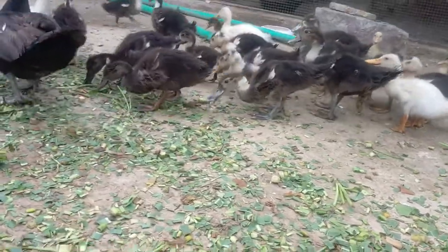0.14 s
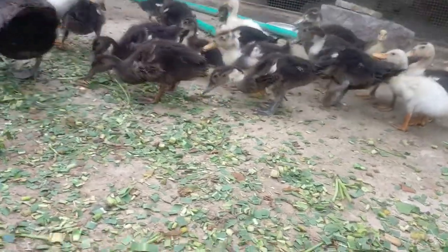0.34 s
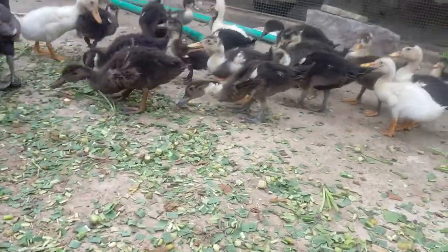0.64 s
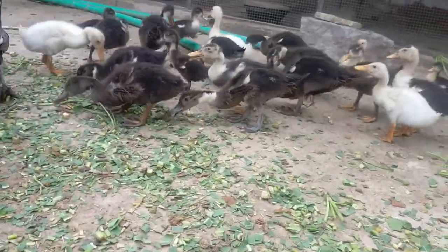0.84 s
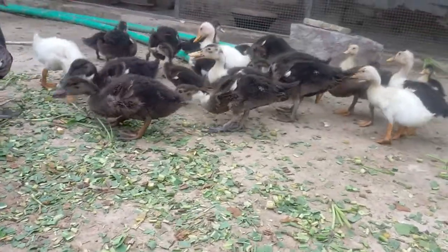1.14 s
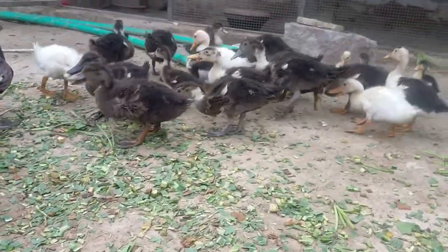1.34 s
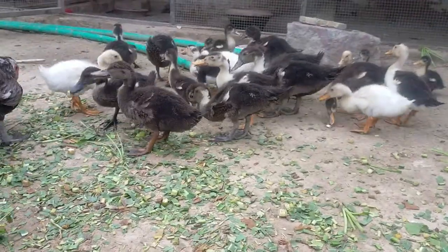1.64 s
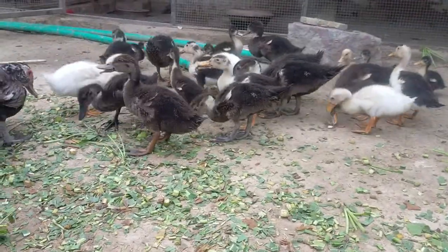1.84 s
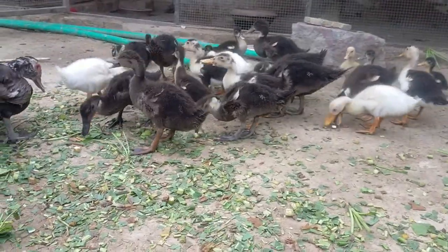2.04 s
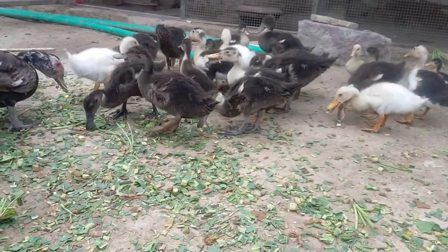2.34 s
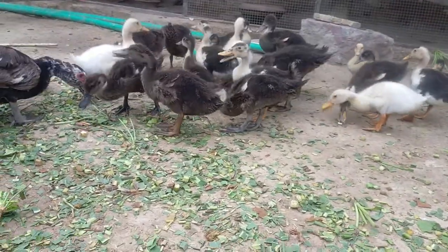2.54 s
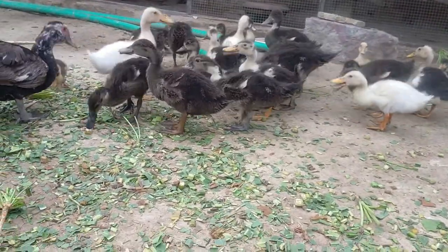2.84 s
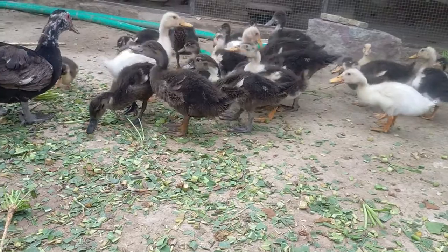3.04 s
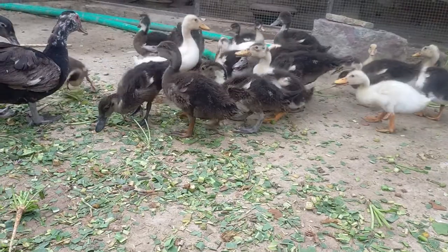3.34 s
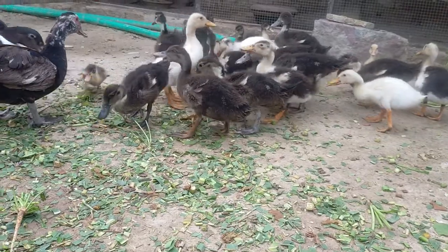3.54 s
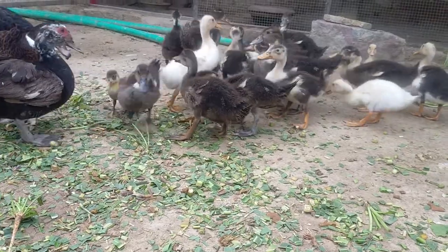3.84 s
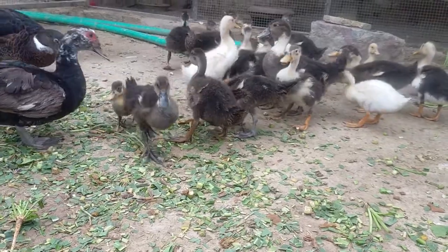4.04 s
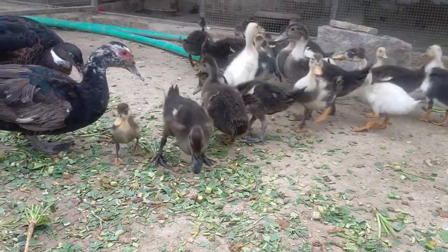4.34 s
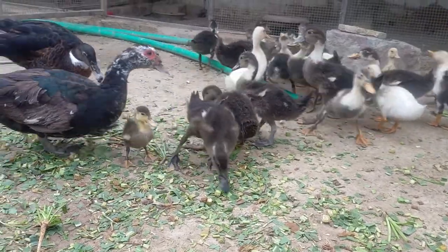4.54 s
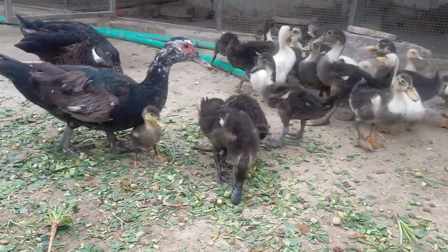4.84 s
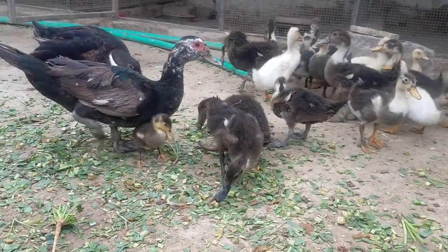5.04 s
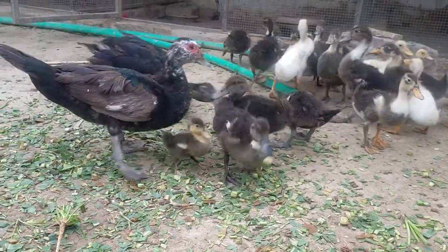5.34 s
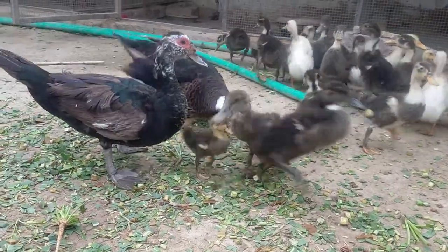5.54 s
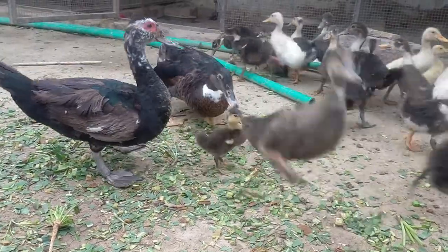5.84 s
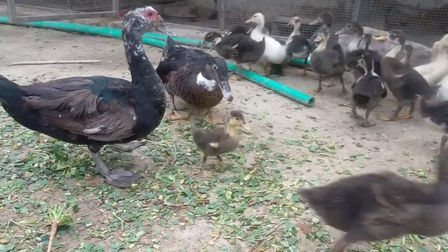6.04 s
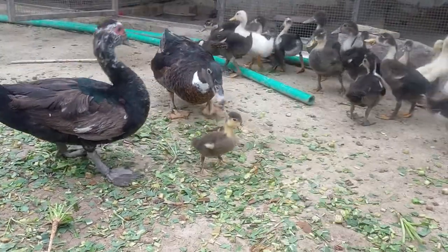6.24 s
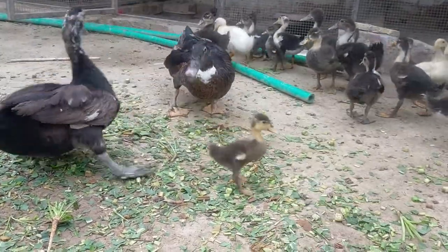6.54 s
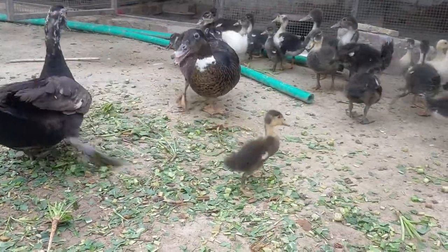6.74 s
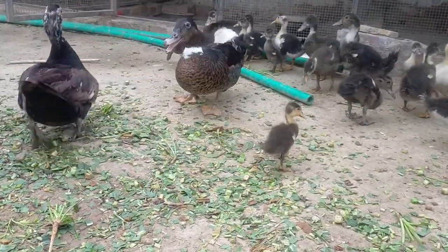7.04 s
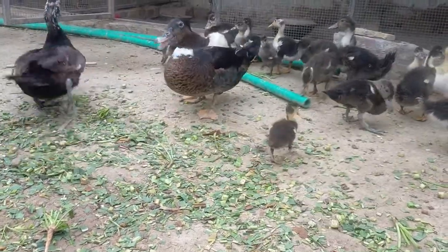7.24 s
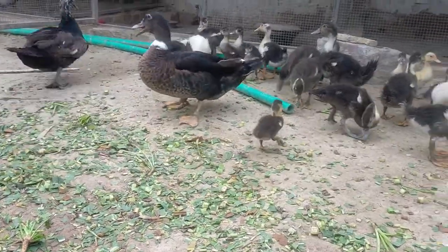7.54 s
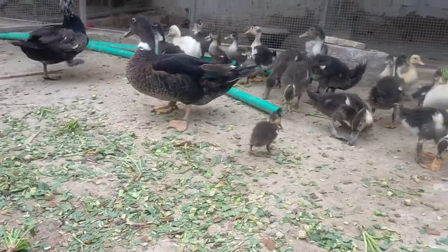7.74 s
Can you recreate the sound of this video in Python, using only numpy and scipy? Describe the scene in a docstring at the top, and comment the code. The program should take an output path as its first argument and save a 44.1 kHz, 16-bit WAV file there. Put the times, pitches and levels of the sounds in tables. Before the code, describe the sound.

A flock of ducklings twitters and peeps over rustling leaves, a duck quacks early, and a rooster crows hoarsely close by near the end.

```python
"""Ducklings and a rooster in a walled yard

A flock of ducklings feeds around the microphone: twitter from many small arched whistles, fluttered trills,
thin rasps of filtered air, gliding peeps and one shrill squeal; leaves rustle, a few dull knocks are heard.
A grown duck quacks in the first three seconds, pulses ringing its throat; a hen murmurs far off later on.
Near the end a rooster crows close by: hoarse and rasping, a crack, then a clean harmonic note that sinks.
One microphone in the open air, the same in both ears."""
import sys
import numpy as np
from scipy import signal
from scipy.fft import rfft, irfft
from scipy.io import wavfile
from scipy.ndimage import uniform_filter1d, map_coordinates

SR = 44100
rng = np.random.default_rng(int(sys.argv[2]) if len(sys.argv) > 2 else 0)


def store_wav(level_fs):
    """Save 16-bit WAV to argv[1]."""
    pcm = np.round(np.clip(np.atleast_2d(level_fs), -1, 1) * 32767)
    wavfile.write(sys.argv[1], SR, pcm.T.astype(np.int16))


N = 347949

# how busy the flock is: (time [s], level [dB] before the twitter's own trim)
FLOCK_ACTIVITY = [(0.0, -41.5), (0.15, -52), (0.96, -49.5), (1.09, -38), (1.35, -51.5), (1.89, -46),
                  (2.04, -42.5), (2.7, -53.5), (3.15, -42.5), (3.27, -50), (5.71, -49.5), (6.05, -56)]
# spectrum of the rooster's rasp and breath: (frequency [Hz], relative level [dB])
ROOSTER_RASP = [(260, -51.5), (450, -35.5), (759, -19), (921, -4.5), (1170, -13.5), (1340, 5.5), (1570, -9),
                (2320, -6), (2520, -20), (3180, -25.5), (3460, -42), (4580, -24.5), (6830, -34),
                (7620, -28), (8200, -70), (10700, -64), (18000, -120)]
CRACK_START_S, CRACK_LENGTH_S = 6.73, 0.13


def from_db(db):
    """Decibels to gain."""
    return 10 ** (np.asarray(db) / 20)


def rms_one(x):
    """Scale to rms 1."""
    return x / np.sqrt(np.mean(x ** 2) + 1e-20)


def since(start):
    """Seconds since a moment, at every sample."""
    return np.arange(N) / SR - start


def in_time(rows):
    """Each column of a curve at every sample."""
    s, *columns = np.transpose(rows)
    return [np.interp(since(0), s, column) for column in columns]


def at_hz(points, hz):
    """Read a spectrum in dB, along a logarithmic frequency axis."""
    table_hz, table_db = np.transpose(points)
    return np.interp(np.log(hz), np.log(table_hz), table_db)


def wander(rate, size):
    """Smooth random curve, spread about 1, through so many random knots a second."""
    knots = rng.standard_normal(int(size * rate / SR) + 4)
    steps = np.arange(0, len(knots), 1 / 8)
    curve = map_coordinates(knots, [steps], order=2, mode="nearest")
    return np.interp(np.arange(size) * (rate / SR) + 1, steps, curve)


def phase_of(hz):
    """Running phase of a gliding tone."""
    return 2 * np.pi * np.cumsum(hz) / SR


def lowpass(x, order, hz):
    """Butterworth low-pass."""
    return signal.sosfilt(signal.butter(order, hz, fs=SR, output="sos"), x)


def coloured(x, spectrum):
    """Give a sound a spectrum; rms 1."""
    hz = np.fft.rfftfreq(N, 1 / SR) + 1e-3
    gain = from_db(at_hz(spectrum, hz))
    return rms_one(irfft(rfft(x) * gain, N))


def resonate(x, modes):
    """Parallel two-pole resonances with alternating signs."""
    out = 0
    for k, (hz, width, db) in enumerate(modes):
        r = np.exp(-np.pi * width / SR)   # pole radius: the narrower, the longer it rings
        poles = [1, -2 * r * np.cos(2 * np.pi * hz / SR), r * r]
        ringing = signal.lfilter([1, 0, -1], poles, x + 1e-18)
        out = out + (-1) ** k * from_db(db) * (1 - r * r) / 2 * ringing
    return out


def swell(size, edges):
    """A call opens and closes smoothly; edges is the share of it spent doing so."""
    return signal.windows.tukey(size, float(np.clip(edges, 0, 1)))


def envelope(age, length, attack, release):
    """Attack, hold and release, from 0 to 1; all times in seconds."""
    return np.clip(age / attack, 0, 1) * np.clip((length - age) / release, 0, 1)


def add(out, start, sound):
    """Mix a sound in at a time, cutting what lies outside the scene."""
    at = int(start * SR)
    sound = sound[max(-at, 0):max(N - at, 0)]
    out[max(at, 0):max(at, 0) + len(sound)] += sound


def peep(length, first_hz, middle_hz, last_hz, overtone_db, waver=0.0012):
    """A whistle with two overtones, arching through three pitches; waver is a share of pitch."""
    size = int(length * SR)
    parabola = np.polyfit([0, .5, 1], [first_hz, middle_hz, last_hz], 2)
    hz = np.polyval(parabola, np.linspace(0, 1, size))
    phase = phase_of(hz * (1 + waver * wander(400, size)))
    tone = sum(from_db(k * overtone_db) * np.sin((k + 1) * phase) for k in range(3))
    return rms_one(tone) * swell(size, 0.59)


def open_air(level_db=-51.5):
    """Rumble and hiss of the open air: steady noise given a spectrum."""
    # (frequency [Hz], relative level [dB])
    air_spectrum = [(12, -31.5), (20, 4.5), (108, 4.5), (230, -9), (569, -12.5), (696, -9.5), (809, -14.5),
                    (1270, -4.5), (1440, -3.5), (1950, -8.5), (3480, -33.5), (5080, -16.5), (5760, -27.5),
                    (7050, -8), (8200, -39), (10700, -65.5), (18000, -120)]
    return from_db(level_db) * coloured(rng.standard_normal(N), air_spectrum)


def twitter(count, pitch_hz, spread, overtone_db, uneven_db, waver):
    """Many small arched peeps from all over the flock, some nearer and some farther by level; rms 1."""
    out = np.zeros(N)
    for k, (when, span, rise, fall, nearness, voice) in enumerate(rng.random((count, 6))):
        top_hz = pitch_hz * np.exp(spread * (2 * voice - 1))
        first_hz, last_hz = top_hz * (1 - 0.2597 * rise), top_hz * (1 - .36 * fall)
        call = peep(.02 + .036 * span, first_hz, top_hz, last_hz, overtone_db, waver)
        start = (k + 2 * when - 1) / count * N / SR   # evenly spread, each shifted by chance
        add(out, start, from_db(2 * uneven_db * nearness ** 2) * call)
    return rms_one(out)


def chatter(twitter_db=-2, thin_db=-59.5, murmur_db=-69, top_hz=6500):
    """The flock's twitter follows how busy it is; thin high peeps and low murmurs go on throughout."""
    middle = twitter(count=720, pitch_hz=1993, spread=.27, overtone_db=-16, uneven_db=8.0, waver=0.025)
    thin = twitter(count=200, pitch_hz=3714, spread=.45, overtone_db=-19, uneven_db=3.5, waver=.04)
    low = twitter(count=150, pitch_hz=483, spread=0.49, overtone_db=-9.5, uneven_db=7, waver=0.021)
    busy_db = in_time(FLOCK_ACTIVITY)[0]
    voices = from_db(busy_db + twitter_db) * middle
    voices += from_db(thin_db) * thin + from_db(murmur_db) * low
    return lowpass(voices, 6, top_hz)


def trills(beat_hz=80, sweep=0.125, jitter=0.0862, throb=0.51, second_db=-23, third_db=-21):
    """The nearer trills: a whistle chopped and swept by a fast, uneven flutter of the syrinx."""
    # (start [s], length [s], pitch [Hz], level [dB])
    trill_calls = [(-.02, 0.15, 2017, -35), (.453, 0.098, 2070, -39.5), (.56, 0.063, 1967, -37.5),
                   (.666, 0.053, 1930, -37), (.864, .15, 1885, -37), (1.091, 0.13, 1993, -44.5),
                   (1.246, 0.065, 2045, -36.5), (1.455, 0.17, 1838, -39), (1.806, 0.048, 2053, -38),
                   (1.896, 0.053, 1977, -34), (1.962, 0.072, 1780, -40), (2.028, 0.11, 2088, -37),
                   (2.161, .12, 1947, -36.5), (2.434, 0.087, 1828, -37), (2.49, 0.12, 1950, -35.5),
                   (2.793, .13, 1885, -38), (2.967, 0.13, 1857, -46.5), (3.227, 0.1, 1952, -42),
                   (3.51, .2, 1935, -43), (3.849, 0.041, 1885, -41.5), (3.925, 0.074, 1907, -45),
                   (4.168, 0.13, 1823, -46), (4.994, 0.051, 1945, -38.5), (6.321, 0.042, 1928, -34.5),
                   (7.228, 0.062, 1770, -36.5), (7.35, .051, 1820, -37)]
    out = np.zeros(N)
    for start, length, hz, db in trill_calls:
        size = int(length * SR)
        beat = phase_of(beat_hz * np.exp(0.38 * wander(130, size))) + rng.uniform(0, 2 * np.pi)
        arch = 1 + 0.1008 * (np.hanning(size) - .6)
        unsteady = 1 + sweep * np.sin(beat) + jitter * wander(1100, size)
        phase = phase_of(hz * arch * unsteady)
        tone = np.sin(phase) + from_db(second_db) * np.sin(2 * phase) + from_db(third_db) * np.sin(3 * phase)
        flutter = (1 + throb * np.cos(beat)) * from_db(1.8 * wander(712, size))
        add(out, start, from_db(db) * rms_one(tone * flutter) * swell(size, 0.27))
    return out


def rustle(level_db=-56, follows=0.2, shared_db=7, patchy_db=7.0, patch_hz=20, count=10):
    """Feet and bills in the chopped leaves: short scuffs, each in its own part of the spectrum."""
    # spectrum of the leaves: (frequency [Hz], relative level [dB])
    leaf_spectrum = [(1100, -7), (2000, -1.5), (2900, 18.5), (3700, -15), (5100, 14), (6000, 5.5),
                     (7000, -20), (7800, -20.5)]
    out = 0
    together = wander(patch_hz, N)
    edges = np.geomspace(1100, 8000, count + 1)
    for low, high in zip(edges, edges[1:]):
        bandpass = signal.butter(2, [low, high], "band", fs=SR, output="sos")
        band = signal.sosfilt(bandpass, rng.standard_normal(N))
        scuff_db = np.minimum(shared_db * together + patchy_db * wander(patch_hz, N), 6)
        out = out + band * from_db(at_hz(leaf_spectrum, np.sqrt(low * high)) + scuff_db)
    busy_db = in_time(FLOCK_ACTIVITY)[0]
    # follows: share of the flock's swing in level
    return from_db(level_db + follows * (busy_db - busy_db.mean())) * rms_one(out)


def quacks(jitter=.03, breath=0.071, uneven_db=2.0):
    """Uneven pulses and puffs of air ring the duck's throat and body; each quack swells and fades."""
    # (start [s], length [s], pitch [Hz], fall [share of pitch], level [dB], body against throat [dB])
    quack_calls = [(0.127, 0.056, 233.8, 0.12, -25.5, -18), (0.335, 0.074, 203.6, -0.22, -30, -19.5),
                   (0.508, 0.0885, 214.3, .08, -29, -15.5), (1.01, 0.099, 194.9, 0.29, -32.5, -11),
                   (1.089, 0.09, 209.3, 0.26, -31, -11.5), (1.524, 0.076, 290.2, 0.11, -39.5, -7.5),
                   (1.605, .064, 235, 0.1, -31, -18), (2.089, 0.061, 217.5, 0.12, -36.5, -18),
                   (2.337, 0.06, 250.2, 0.41, -31.5, -22), (3.015, 0.076, 216.6, .1, -40.5, -18)]
    # resonances of the throat, then of the body: (centre [Hz], width [Hz], relative level [dB])
    throat_modes = [(800, 107, -8), (1412, 132, 6.5), (1950, 510, -9), (2960, 350, -17.5),
                    (5300, 130, -22.5)]
    body_modes = [(202, 81, 4), (426, 125, 5), (785, 100, 2)]
    out = np.zeros(N)
    for start, length, hz, fall, db, body_db in quack_calls:
        size = int(length * SR)
        phase = phase_of(hz * (1 + fall * np.linspace(.5, -.5, size) + jitter * wander(208, size)))
        pulses = np.diff(phase // (2 * np.pi), prepend=0) * from_db(uneven_db * wander(212, size))
        puffs = breath * rng.standard_normal(size) * (1 + np.cos(phase)) / 2
        source = pulses + puffs
        call = resonate(source, throat_modes) + from_db(body_db) * resonate(source, body_modes)
        add(out, start, from_db(db) * rms_one(call) * np.hanning(size))
    return out


def rasps(flutter_db=2.5, flutter_hz=260, top_hz=7100, edges=0.48, arch=.07):
    """Fluttering air through one narrow, high resonance that rises and falls with each call."""
    # (start [s], length [s], centre [Hz], width [Hz], level [dB])
    rasp_calls = [(0.141, 0.026, 5330, 400, -46.5), (0.369, 0.034, 5330, 1990, -43.5),
                  (0.593, 0.092, 6140, 990, -37), (0.932, 0.064, 5100, 2040, -45),
                  (1.252, 0.052, 5750, 1500, -48), (1.522, .1, 5800, 1190, -49.5),
                  (1.69, 0.097, 6090, 1560, -40.5), (1.788, 0.2, 5160, 1300, -47.5),
                  (2.037, 0.082, 5370, 1100, -37), (2.054, .18, 5440, 620, -38),
                  (2.699, 0.057, 5320, 900, -40), (2.709, 0.2, 5560, 650, -36.5),
                  (3.622, .14, 3120, 700, -49.5), (3.624, 0.12, 5600, 1780, -47.5),
                  (3.706, 0.069, 6400, 1430, -37.5), (3.946, 0.044, 5540, 1290, -46.5),
                  (4.389, 0.078, 5700, 1300, -50), (4.631, 0.1, 5280, 1780, -40),
                  (5.707, 0.03, 5800, 2980, -38), (6.16, 0.036, 5250, 900, -44),
                  (6.33, 0.042, 5140, 1000, -39), (7.22, 0.056, 5260, 1000, -45.5),
                  (7.5, .14, 5100, 1100, -51.5), (7.851, 0.046, 5460, 2000, -44.5)]
    out = np.zeros(N)
    for start, length, hz, width, db in rasp_calls:
        size = int(length * SR)
        air = rng.standard_normal((2, size)) * from_db(flutter_db * wander(flutter_hz, size))
        slow = lowpass(air, 2, width / 2)
        phase = phase_of(hz * (1 + arch * (1 / 4 - np.linspace(-1, 1, size) ** 2)))
        # two slow noises on a cosine and a sine make a band of noise about the gliding centre
        band = slow[0] * np.cos(phase) + slow[1] * np.sin(phase)
        add(out, start, from_db(db) * rms_one(band) * swell(size, edges))
    return lowpass(out, 8, top_hz)


def peeps(end_drop=0.076, full_drop_hz=3040):
    """The nearer single peeps: each glides and arches, the lower ones more flatly."""
    # (start [s], length [s], pitch [Hz], rise [share of pitch], level [dB], step between overtones [dB])
    peep_calls = [(0.377, 0.012, 1590, .02, -38, 2), (.395, .08, 1555, 0, -44.5, -6),
                  (.454, 0.054, 3070, -0.33, -45, -28), (0.456, 0.052, 848, -0.09, -49.5, -8),
                  (1.521, 0.036, 920, -0.052, -40.5, -7), (1.599, 0.034, 933, .13, -41, -17),
                  (2.293, .064, 2860, -0.36, -50, -26), (2.359, 0.035, 928, -1, -41.5, -23),
                  (2.374, .049, 1470, -0.043, -42, -24), (2.639, 0.075, 2890, 0.18, -47.5, -30),
                  (3.005, 0.043, 884, -0.12, -46, -3), (3.182, 0.053, 3370, -.06, -54.5, -5),
                  (3.58, .07, 3580, -0.25, -53, -11), (3.663, .014, 1513, 0.059, -29.5, -6),
                  (3.685, 0.042, 1530, -0.026, -48, -17), (3.758, 0.03, 2440, 0.011, -46, 2),
                  (3.898, 0.049, 2320, -.18, -43, -9.5), (3.955, 0.059, 1350, .02, -35, -11.5),
                  (4.043, 0.06, 2305, -0.098, -54, -20), (4.081, 0.051, 1362, -.03, -39.5, -15),
                  (4.087, 0.038, 3410, -0.17, -46, -3), (4.272, 0.033, 4950, -0.19, -53, -20),
                  (4.299, 0.045, 2310, 0.12, -48, -8), (4.46, .027, 4350, -.14, -49, -25),
                  (4.494, 0.028, 1230, -0.13, -42, -6.5), (4.659, 0.11, 1157, -.015, -38, -28),
                  (4.672, 0.062, 1460, 0, -45.5, -16), (4.851, 0.035, 2230, -0.39, -45, -12),
                  (5.398, 0.046, 2120, -0.26, -45, -17), (5.414, 0.05, 3180, 0.2, -52.5, -3),
                  (5.863, 0.027, 1980, 0.2, -43, -27)]
    out = np.zeros(N)
    for start, length, hz, rise, db, overtone_db in peep_calls:
        ends = 1 - end_drop * min(hz / full_drop_hz, 1) ** 2   # both ends hang below the middle
        call = peep(length, hz * (ends - rise / 2), hz, hz * (ends + rise / 2), overtone_db)
        add(out, start, from_db(db) * call)
    return out


def knocks():
    """Soft, short, dull bumps, the last ones in a quickening run: an impulse rings two low resonances."""
    # (time [s], peak level [dB])
    knock_times = [(2.829, -32.5), (7.072, -22.5), (7.176, -30.5), (7.204, -39), (7.229, -40), (7.252, -38),
                   (7.273, -41), (7.291, -39)]
    # (centre [Hz], width [Hz], relative level [dB])
    knock_modes = [(338, 210, 16.5), (650, 340, 16.5)]
    out = np.zeros(N)
    bump = lowpass(resonate(signal.unit_impulse(2000), knock_modes), 2, 1000)
    for start, db in knock_times:
        add(out, start, from_db(db) * bump / np.abs(bump).max())
    return out


def far_hen(overtone_db=-2, bend=0.041):
    """Soft, low notes from across the yard, each starting a little high."""
    # (start [s], length [s], pitch [Hz], level [dB])
    hen_notes = [(4.373, 0.062, 367, -63), (5.254, 0.13, 356, -60), (5.492, 0.11, 354, -59),
                 (5.899, 0.14, 353, -60.5)]
    out = np.zeros(N)
    for start, length, hz, db in hen_notes:
        add(out, start, from_db(db) * peep(length, hz * (1 + bend), hz, hz, overtone_db))
    return out


def squeal(start_s=5.577, length_s=.172, level_db=-26, low_hz=3187, bend_hz=552,
           delay_s=0.018, push_s=0.13, attack_s=0.014, release_s=0.029, waver=.0023, collapse=0.059,
           sideband_db=-23, weak_db=-13, half_db=-14, held_half_db=-28):
    """A jostled duckling: at full effort a shrill tone and its octave; weak ends break into subharmonics."""
    age = since(start_s)
    effort = envelope(age - delay_s, push_s, attack_s, release_s)
    # the pitch dips to low_hz in the middle and is bend_hz higher at the ends
    hz = low_hz + bend_hz * np.clip(2 * age / length_s - 1, -1, 1) ** 2
    spent = (1 - effort) * (age > length_s / 2)   # the pitch turns ragged as the push ends
    phase = phase_of(hz * (1 + (waver + collapse * spent) * wander(590, N)))
    halves = sum(np.sin(k * phase / 2 + 0.67 * wander(300, N)) for k in (1, 3))
    quarters = sum(np.sin(k * phase / 4 + wander(400, N)) for k in (3, 5, 7))
    tone = from_db(weak_db * (1 - effort)) * (np.sin(phase) + from_db(sideband_db) * quarters)
    octave = effort ** 2 * np.sin(2 * phase)
    broken = (from_db(half_db) * (1 - effort) + from_db(held_half_db)) * halves
    loudness = np.sqrt(2) * from_db(level_db) * envelope(age, length_s, 0.0025, 0.045)
    return loudness * (tone + octave + broken)


def crack_strength(attack_s=0.0082, release_s=0.14):
    """The crack comes quickly and dies away; within 0-1."""
    return envelope(since(CRACK_START_S), CRACK_LENGTH_S, attack_s, release_s)


def crow_hoarse(sag=.03, jitter=.0035, drift=.004, shimmer_db=3.0, half_blur=0.12, catch_s=0.014,
                rasp_caught=0.026, surge_hz=4.35, surge_peak_s=6.635, surge_db=11,
                crack_hiss_db=7, fullness=0.65):
    """Strained syllables: each opens in rasp, may catch on a period-doubled tone, and sags at its end."""
    # the third syllable opens the last note: (start [s], length [s], attack [s], release [s],
    # rasp at first [share 0-1], time until the tone catches [s], pitch [Hz], level [dB],
    # half-pitch lines before their surges [dB], hiss before the crack's boost [dB])
    syllables = np.array([(6.088, 0.24, 0.042, .11, 0.9, .25, 897, -26.5, 10.5, -30),
                          (6.382, .595, 0.09, 0.044, 0.96, 0.0664, 874.4, -20, -8, -21.5),
                          (6.957, 0.13, 0.029, .11, 0.49, .14, 837, -21.5, -12, -25)])
    # (multiple of pitch [ratio], relative level [dB])
    hoarse_lines = [(0.5, -42), (1, 1), (1.5, -4.5), (2, 1.5), (2.5, -12.5), (3, -10.5), (3.5, -30.5),
                    (4, -23.5), (4.5, -24.5), (5, -17.5), (5.5, -26), (6, -36.5), (6.5, -37), (7, -39.5),
                    (7.5, -26.5), (8, -20.5), (8.5, -32), (9, -40.5)]
    # hiss of the strained voice: (frequency [Hz], relative level [dB])
    strain_spectrum = [(1500, -27.5), (3000, 6), (3500, -4), (4500, 7), (5300, -4.5), (6100, -9),
                       (6950, 8.5), (7500, -24.5), (8200, -18.5)]

    t = since(0)
    current = syllables[np.searchsorted(syllables[1:, 0], t)]   # the syllable in force at every sample
    start, length, attack, release, rasp, catches, pitch_hz, db, half_db, hiss_db = current.T
    age = t - start
    uncaught = (1 - np.tanh((age - catches) / catch_s)) / 2
    rasp_share = np.clip(rasp_caught + (rasp - rasp_caught) * uncaught, 0, 1)
    # the half-pitch lines come in surges
    half_db = half_db + surge_db * np.cos(2 * np.pi * surge_hz * since(surge_peak_s))

    hz = pitch_hz * (1 - sag * np.clip(age / length, 0, 1) ** 7 + drift * wander(35, N))
    phase = phase_of(hz * (1 + jitter * (1 + 7 * rasp_share) * wander(500, N)))
    tone = np.zeros(N)
    for multiple, line_db in hoarse_lines:
        half_steps = round(2 * multiple)
        halfway = half_steps % 2   # lines between the harmonics come and go, and are blurred
        blur = halfway * half_blur * wander(200, N) + rng.uniform(0, 2 * np.pi)
        gain = from_db(line_db + halfway * half_db + shimmer_db * wander(45, N))
        tone += gain * np.sin(half_steps / 2 * phase + blur)
    tone /= np.sqrt(uniform_filter1d(tone ** 2, size=1500))   # even loudness

    puffs = rng.standard_normal(N) * (1 + np.cos(phase / 2))   # one puff every second period
    hiss = from_db(hiss_db + crack_hiss_db * crack_strength()) * coloured(puffs, strain_spectrum)
    rasping = np.sqrt(rasp_share) * coloured(puffs, ROOSTER_RASP)
    voice = np.sqrt(1 - rasp_share) * tone + rasping + hiss
    loudness = from_db(db) * envelope(age, length, attack, release) ** fullness
    return uniform_filter1d(loudness, size=300) * voice


def crow_crack(level_db=-16.5, pitch_hz=958, leap_hz=144, settle_s=0.024, jitter=.03,
               octave_db=-3, upper_db=-26, shimmer_db=2.0):
    """The other side of the syrinx breaks loose: a second, shaky tone leaps above its pitch and settles."""
    age = np.maximum(since(CRACK_START_S), 0)
    hz = pitch_hz + leap_hz * np.exp(-age / settle_s)
    phase = phase_of(hz * (1 + jitter * wander(450, N)))
    upper = sum(np.sin(k * phase) for k in range(3, 8))
    tone = np.sin(phase) + from_db(octave_db) * np.sin(2 * phase) + from_db(upper_db) * upper
    shimmer = shimmer_db * np.tanh(wander(250, N))
    return from_db(level_db + shimmer) * crack_strength() * rms_one(tone)


def crow_last_note(start_s=7.015, attack_s=0.023, jitter=.002, shimmer_db=2.0, flutter_db=5, flutter_hz=60,
                   shake_db=2.5, shake_hz=28, breath_db=-27):
    """A clean note through the throat's resonances; its upper harmonics flutter more and more as it sinks,
    as echo beats with the gliding tone: random swings in level stand for that beating."""
    # (time [s], pitch [Hz], level [dB])
    note_curve = [(7.04, 661, -26.5), (7.082, 665, -25), (7.184, 671, -21.5), (7.354, 668.5, -22),
                  (7.434, 662.3, -24.5), (7.496, 654.8, -21.5), (7.564, 650.8, -26.5), (7.734, 639.6, -25),
                  (7.885, 613.7, -32.5)]
    # response of the throat: (frequency [Hz], relative level [dB])
    throat_response = [(610, -14.5), (670, -12), (1250, -0.5), (1340, 5.5), (1880, -4.5), (2010, 0.5),
                       (2500, -13.5), (2690, -18), (3150, -14.5), (3350, -30), (4020, -9.5), (4700, -39.5),
                       (6000, -33.5), (7300, -22), (8000, -35.5)]
    hz, db = in_time(note_curve)
    age = since(start_s)
    sinking = np.clip(age / age[-1], 0, 1)   # grows from 0 to 1 over the note
    phase = phase_of(hz * (1 + jitter * wander(250, N)))
    tone = np.zeros(N)
    for k in range(1, 14):
        unsteady_db = shimmer_db * wander(13, N)
        unsteady_db += (k > 2) * flutter_db * sinking * wander(flutter_hz, N)   # only the upper harmonics
        gain = from_db(at_hz(throat_response, k * hz) + unsteady_db)
        tone += gain * np.sin(k * phase + rng.uniform(0, 2 * np.pi))
    tone /= np.sqrt(uniform_filter1d(tone ** 2, size=1500))   # even loudness
    breath = from_db(breath_db) * coloured(rng.standard_normal(N), ROOSTER_RASP)
    shaken_db = db + shake_db * sinking * wander(shake_hz, N)
    return from_db(shaken_db) * np.clip(age / attack_s, 0, 1) * (tone + breath)


def yard(x, echo_db, t60_s=0.23, first_echo_s=0.0038):
    """Scattered echoes from the walls and the coop: decaying noise convolved with the sound."""
    t = np.arange(SR // 2) / SR
    echoes = rng.standard_normal(len(t)) * from_db(-60 * t / t60_s) * (t > first_echo_s)
    echoes /= np.linalg.norm(echoes)
    return x + from_db(echo_db) * signal.fftconvolve(x, echoes)[:N]


def scene():
    """Flock and rooster in the yard under open air; the close voices have less echo, the knocks none."""
    flock = chatter() + trills() + rustle() + quacks() + rasps() + peeps() + far_hen()
    close = squeal() + crow_hoarse() + crow_crack() + crow_last_note()
    mono = open_air() + yard(flock, echo_db=-5.0) + knocks() + yard(close, echo_db=-16)
    return np.array([mono, mono])


def record(dry):
    """The recorder cuts the top steeply, above 8200 Hz."""
    return signal.sosfilt(signal.ellip(10, .3, 80, 8200, fs=SR, output="sos"), dry)


dry = scene()
out = record(dry)
store_wav(out)
```